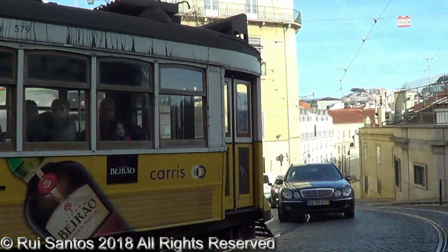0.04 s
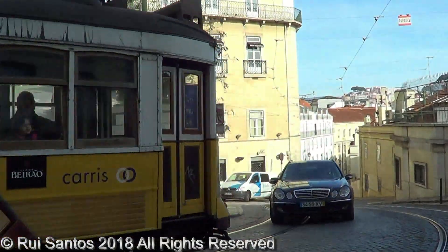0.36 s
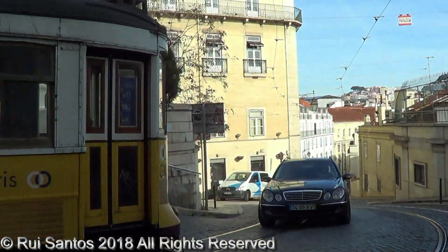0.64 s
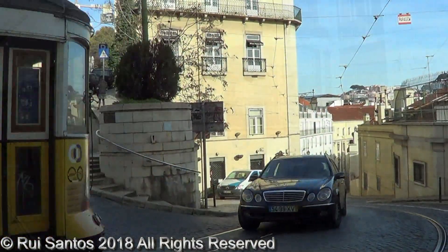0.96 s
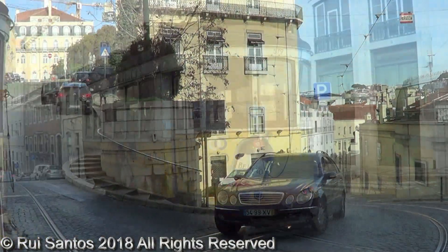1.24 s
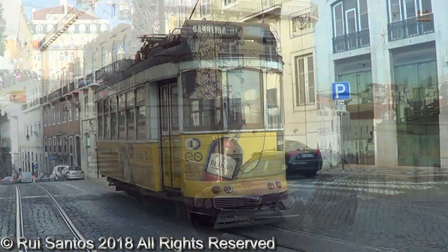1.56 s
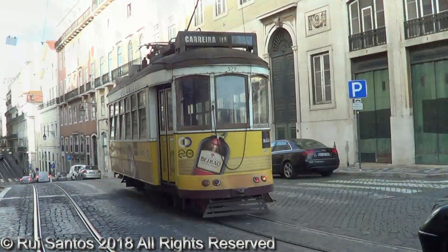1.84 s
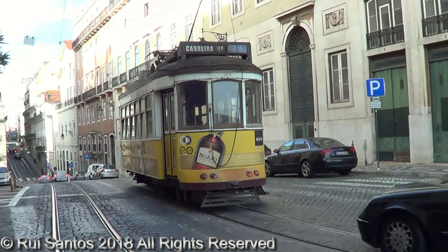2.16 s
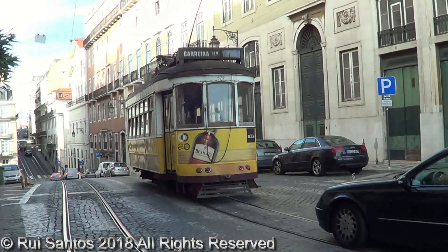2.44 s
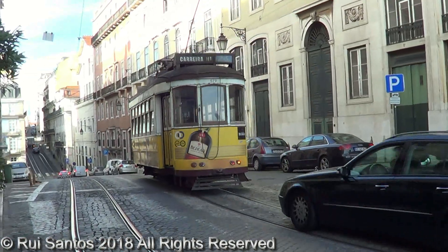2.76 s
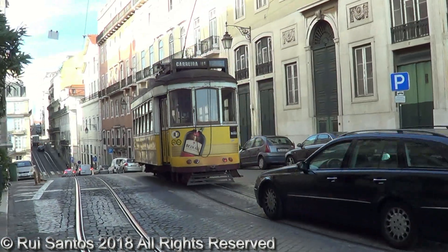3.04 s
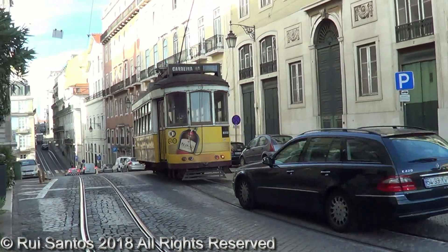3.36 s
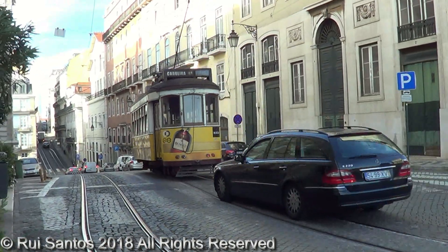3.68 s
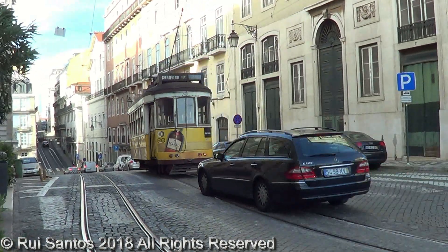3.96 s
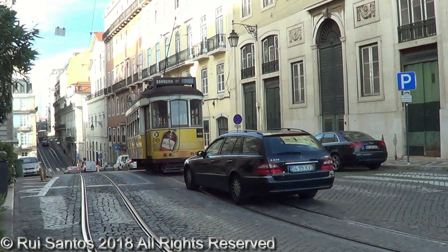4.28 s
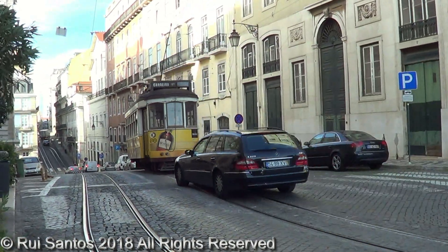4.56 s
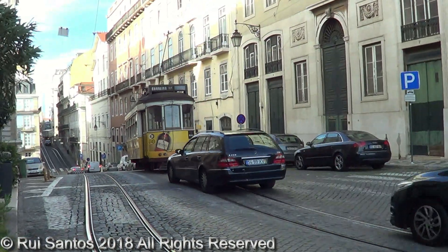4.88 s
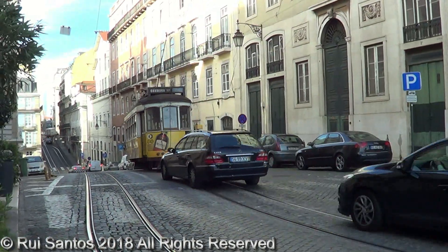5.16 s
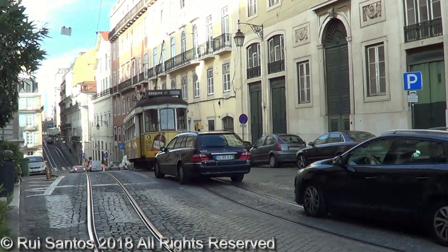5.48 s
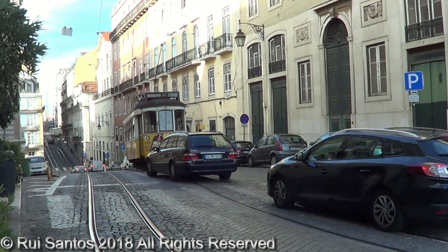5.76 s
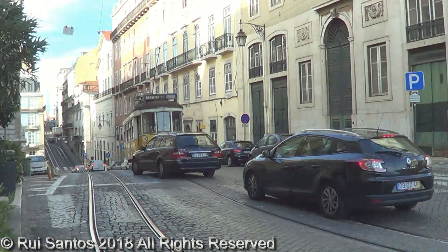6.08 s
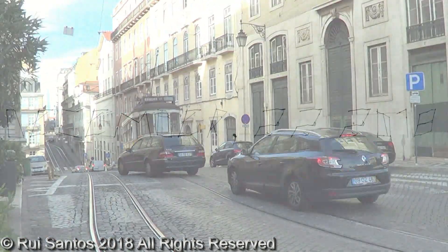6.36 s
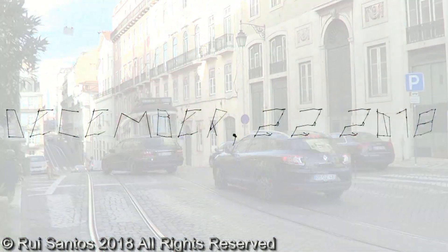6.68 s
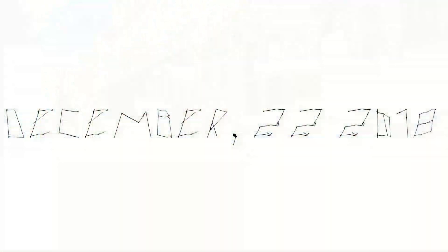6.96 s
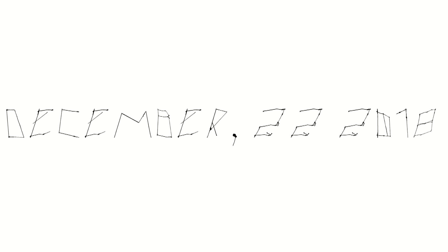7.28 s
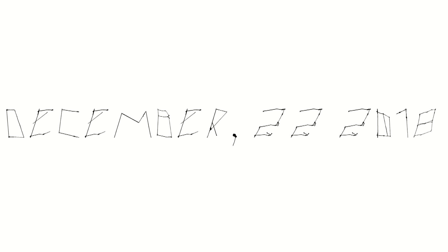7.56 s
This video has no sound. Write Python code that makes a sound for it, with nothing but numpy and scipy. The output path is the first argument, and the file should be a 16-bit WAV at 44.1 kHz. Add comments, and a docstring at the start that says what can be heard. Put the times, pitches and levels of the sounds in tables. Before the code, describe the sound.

An old tram grinds and squeals round a curve close by, then rolls off as two cars follow, thumping over cobbles.

```python
"""An old tram grinds round a curve close by: rough rails rumble in its body and ring its wheels, the
gears whine, and the flanges (the wheels' guiding rims) scrape, bite and squeal on the rail.
From 1 to 2 s the sound blends over to a spot down the street, where the tram clacks, sings faintly
and rolls off. Two cars follow over the cobbles, nearest at about 4 and 6 s, their tyres drumming
and thumping on the track. By 7 s everything has faded out."""
import sys
import numpy as np
from scipy import signal
from scipy.fft import rfft, irfft, next_fast_len
from scipy.io import wavfile

SR = 44100
rng = np.random.default_rng(int(sys.argv[2]) if len(sys.argv) > 2 else 0)


def unload_audio(sound):
    """Save the sound as a 16-bit wav file, at the path given as the first command line argument."""
    columns = np.transpose(np.atleast_2d(sound))
    # keep every value between -1 and 1, then stretch to whole-number steps
    steps = np.round(np.clip(columns, -1, 1) * 32767)
    wavfile.write(sys.argv[1], SR, steps.astype(np.int16))


N = 340893
SIZE = next_fast_len(N, True)
TIME, FREQ = np.arange(N) / SR, np.arange(SIZE // 2 + 1) * SR / SIZE

# how much sound comes from the sides: (frequency [Hz], side minus middle [dB])
STEREO_WIDTH = [(50, 1), (110, -5), (220, -9.5), (450, -8.5), (900, -9), (2100, -10), (3000, -7.5),
                (5000, -5), (7200, -5), (9700, -10), (12000, -35)]
# how far the left channel runs ahead of the right: (frequency [Hz], phase [rad])
LEFT_LEAD = [(0, 0.21), (400, 0.51), (1700, 0.083), (4800, .55), (7000, 0.21), (7900, 0.00035)]

# the passing cars: (time when nearest [s], distance [m], drumming [dB], hiss [dB], boom [dB])
CAR_PASSES = [(4.1, 4.4, -31, -30.5, -63), (5.9, 4.3, -33, -30.5, -38)]
# tyres drumming, tread hissing and car bodies shaking: (frequency [Hz], level [dB])
DRUM_SPECTRUM = [(25, -38), (55, -25), (100, -9), (160, -6.5), (215, 1.5), (280, -1), (400, -13),
                 (900, -19.5)]
TREAD_SPECTRUM = [(250, -9), (500, -4.5), (900, 3), (1300, -4), (2200, -8), (4500, -24), (10000, -27.5),
                  (15000, -34.5)]
BOOM_SPECTRUM = [(25, -15), (55, -1), (120, 0), (165, 7), (260, -16)]
# the air in a nearby car's tyres hums: (start [s], length [s], pitch [Hz], level [dB])
TYRE_HUMS = [(3.75, 1, 209.9, -32.5), (5.05, 1.15, 188.3, -34.5)]
# tyres drop over a rail or a sunken stone: (time [s], tyre ring [dB], body thud [dB])
TYRE_THUMPS = [(2.53, -16.5, -27.5), (2.585, -16, -23), (3.76, -19.5, -31), (4.15, -17.5, -37),
               (4.452, -14.5, -21), (4.515, -16, -27), (5.115, -20, -20.5), (5.265, -25.5, -22.5),
               (5.915, -15.5, -17), (6.235, -22, -29)]
# modes (natural notes) of a tyre's air and of a sprung car body: (pitch [Hz], decay [s], level [dB])
TYRE_MODES = [(185, 0.032, -6.5), (218.6, 0.052, -3), (251, .035, -6), (306, 0.028, -6.5),
              (479.5, .012, -4.5)]
CAR_BODY_MODES = [(52, .05, -16.5), (91.5, 0.043, -6), (136, 0.044, -6), (159.8, 0.04, -0.5)]

# where the tram's rumble and scrape come from: (time [s], lean to the left [0-1])
TRAM_LEAN = [(0, 0.13), (1, 0.7), (1.7, .22), (3.5, .2), (5.5, 0.07)]
# the teeth of the drive gears meeting: (time [s], pitch [Hz], level [dB])
GEAR_WHINE = [(0, 358, -30.5), (.4, 365, -30), (.55, 370, -40), (.95, 381, -27), (1.1, 382, -33.5),
              (1.35, 394, -33), (1.8, 375, -37.5), (2.55, 381, -31.5), (2.8, 385, -50), (6, 405, -59.5)]
# the tram's body drones: (start [s], length [s], pitch [Hz], level [dB])
BODY_DRONES = [(0, .36, 322, -27), (.23, 0.25, 238.8, -27.5), (.97, .13, 323, -31),
               (1.14, 0.26, 507, -31.5), (2.08, .11, 182.6, -30.5), (2.41, 0.2, 208.5, -27.5)]
# a flange sticks and slips regularly: (start [s], length [s], level [dB])
CHATTER_BOUTS = [(0, 0.52, -40), (0.59, .2, -31), (0.848, 0.42, -36)]
# a wheel sings hoarsely: (start [s], length [s], pitch [Hz], width [Hz], level [dB])
HOARSE_NOTES = [(.22, 0.51, 1340, 110, -32.5), (.872, 0.032, 4330, 220, -29), (.955, .11, 4340, 190, -31),
                (1.8, .035, 7300, 220, -27), (2.215, 0.046, 5980, 220, -29), (2.87, 0.0455, 6150, 350, -30),
                (3.18, .05, 3750, 170, -35), (3.61, .06, 3265, 130, -33.5), (3.58, .14, 10500, 250, -44),
                (3.1, 1.95, 2295, 68, -35), (3, 1.5, 3805, 50, -40.5), (3, 2.1, 4115, 45, -43.5),
                (3.03, 1.34, 6100, 400, -40), (2.85, 1.1, 7300, 200, -42), (3.88, 1.5, 2040, 70, -39.5),
                (4.6, 1.36, 893, 31, -37)]
# a wheel squeals: (start [s], length [s], pitch [Hz], level [dB])
SQUEAL_NOTES = [(.18, 0.34, 1204, -32), (0.328, .19, 1985, -32.5), (0.723, 0.65, 1214, -33.5),
                (2.16, 0.26, 1214, -30), (2.83, .17, 1210, -36), (3.31, .095, 7400, -37.5),
                (3.465, .09, 4160, -37.5)]
# grinding slides between the wheel's modes near 2 kHz: (time [s], pitch [Hz], level [dB])
GRIND_PATH = [(0, 2130, -33.5), (.3, 2168, -30.5), (.67, 2074, -28), (.76, 2230, -30), (1.3, 2193, -31.5),
              (1.7, 2220, -65.5)]
# a flange slaps the rail: (time [s], clash [dB], spit of hiss [dB], wheel ring [dB])
FLANGE_SLAPS = [(2.258, -34, -23.5, -41), (2.461, -21, -30.5, -24), (2.885, -26, -32.5, -22)]
# the steel's clash in a slap: (pitch [Hz], width [Hz], level [dB])
CLASH_MODES = [(3350, 450, -2), (4700, 700, -5), (6400, 560, -1.5), (8100, 1000, -4)]
# the spit of hiss in a slap: (frequency [Hz], level [dB])
SPIT_SPECTRUM = [(3500, -11), (4700, 1.5), (7000, -5), (9800, -1), (12000, -7.5), (15500, -13.5)]
# what a slap leaves ringing in the wheel: (pitch [Hz], decay [s], level [dB])
SLAP_MODES = [(3290, 0.063, -4.5), (3370, .035, -4.5)]
# wheels and rail ringing: (pitch [Hz], width [Hz], level beside the tram [dB], level from behind [dB])
WHEEL_MODES = [(508, 30, -17.5, -29), (795, 45, -20, -21.5), (1350, 80, -19.5, -39), (1995, 30, -17, -25.5),
               (2110, 90, -21.5, -22), (2224, 90, -22, -25), (3256, 120, -20.5, -22),
               (3810, 70, -23, -23.5), (4150, 45, -28.5, -26.5), (4300, 100, -21, -34.5),
               (5930, 91, -22, -31.5), (6420, 110, -35.5, -28), (7150, 120, -33, -30),
               (8130, 140, -24, -26), (8850, 220, -19.5, -29)]
# rolling and flange rasp, beside the tram (near) and from behind (far): (frequency [Hz], level [dB])
NEAR_ROLL_SPECTRUM = [(25, -36), (60, -21.5), (110, -11.5), (170, -9), (240, -2), (360, -2.5), (440, -5),
                      (800, -8.5), (1250, -8.5), (1800, -12), (2250, -11), (2600, -16), (3500, -25)]
FAR_ROLL_SPECTRUM = [(25, -37), (65, -29), (105, -4.5), (150, -6.5), (210, 0.5), (480, -2.5), (800, -3),
                     (1100, -6), (1700, -9.5), (2300, -9.5), (2600, -17.5), (3500, -17.5)]
NEAR_RASP_SPECTRUM = [(1800, -22), (2700, -9), (3400, 1), (4300, -1.5), (4800, -3.5), (6000, -2),
                      (7200, -2.5), (8600, 0.5), (9700, -3), (11000, -4.5), (12500, -12), (15500, -16.5)]
FAR_RASP_SPECTRUM = [(1800, -5.5), (2700, -3.5), (3600, -0.5), (5000, -2.5), (6100, 0), (6900, -2.5),
                     (8700, -2), (10500, -7), (12500, -13), (15500, -22)]
# a flange presses on the rail and the scrape swells: (start [s], length [s], rise below 7 kHz [dB])
FLANGE_BITES = [(0, 0.16, 2.5), (0.414, 0.071, 4.5), (.65, .05, 1.5), (0.852, .28, 3.5), (1.744, 0.5, 3),
                (2.54, 0.36, 3.5), (3.13, 0.2, 3), (3.489, 4.7, 3.5)]

BLEND_S, FADE_S = (1.05, 2.11), (6.205, 7.03)  # the move down the street; the final fade
TRAM_SPEED_M_S, CAR_SPEED_M_S = 3.38, 3.7
TAIL_PASSES_S, NEAR_M, FAR_M = 0.77, 2, 27.3  # the tram is FAR_M away as the blend ends
NEAR_ROLL_DB, NEAR_RASP_DB, NEAR_RING_DB = -18.5, -24.5, -20
FAR_ROLL_DB, FAR_RASP_DB, FAR_RING_DB = -22, -26.5, -20.5
# the cars behind the tram block more and more of its sound, the treble most
BLOCKED_FROM_S, ROLL_LOSS_DB_PER_S, RASP_LOSS_DB_PER_S = 4.4, 0.84, 3
DULL_FROM_S, DULL_TIME_S, BRIGHT_DB, DULL_DB = 1.97, 0.49, 5, -2  # the far rasp above 7 kHz
NEAR_SIDE_DB, FAR_SIDE_DB = -2, .5  # gain for the reflections from the sides
TOP_HZ = 15700


def undb(db):
    """Turn decibels into a gain."""
    return np.exp(np.asarray(db) * (np.log(10) / 20))


def curve(rows):
    """The columns of a table, joined by straight lines in time."""
    times, *columns = np.transpose(rows)
    return [np.interp(TIME, times, column) for column in columns]


def colour(points):
    """Gain at every frequency from a spectrum table; it falls away beyond the ends."""
    hz, db = np.transpose(points)
    octave = np.log2(FREQ + 1)
    beyond = np.maximum(0, np.maximum(np.log2(hz[0]) - octave, octave - np.log2(hz[-1])))
    return undb(np.interp(octave, np.log2(hz), db) - 20 * beyond)


def unit(x):
    """Scale to an average strength (rms) of 1."""
    return x / np.sqrt(np.mean(x ** 2))


def wobble(rate):
    """Random values, rate of them a second, joined by straight lines; typical size 1."""
    count = int(TIME[-1] * rate) + 2
    return unit(np.interp(TIME * rate, np.arange(count), rng.standard_normal(count)))


def gate(start, length, attack, release):
    """Rises from start, holds until length has passed, then dies away; all in seconds."""
    rise = np.clip((TIME - start) / attack, 0, 1)
    return rise * np.exp(-np.clip((TIME - start - length) / release, 0, 50))


def ripple(spacing_hz, depth_db):
    """The many lesser modes of a steel structure: random peaks and valleys in its spectrum."""
    heights = rng.standard_normal(4000)
    return undb(depth_db * np.interp(FREQ / spacing_hz, np.arange(len(heights)), heights))


def knocks(per_s, spread_db, decay_s):
    """The force of small impacts at random moments, each dying quickly."""
    hits = (rng.random(N) < per_s / SR) * undb(spread_db * np.clip(rng.standard_normal(N), -2, 2)) ** 2
    power = signal.lfilter([1], [1, -np.exp(-2 / (decay_s * SR))], hits)
    return unit(np.sqrt(power))


def radiate(force, response, lean):
    """Filtered noise that follows a force: direct sound leans to one side, reflections spread wide."""
    direct, reflected = force * rng.standard_normal((2, N))
    mid, side = rfft([direct, reflected + lean * direct], SIZE) * response
    mid, side = irfft([mid, side * colour(STEREO_WIDTH)], SIZE)[:, :N]
    return np.array([mid + side, mid - side]) / np.std(mid)


def tone(hz, db, wander_hz, flutter_db):
    """A wavering note; reflections make its strength differ a little at each ear."""
    phase = 2 * np.pi * np.cumsum(hz + wander_hz * wobble(70)) / SR
    note = np.sin(phase) * undb(flutter_db * wobble(30))
    return undb(db) * unit(np.array([note * undb(1.5 * wobble(8.13)) for ear in range(2)]))


def ring(hz, width_hz):
    """A mode kept ringing by chance pushes; reflections shift its phase between the ears."""
    turning = np.cumprod(np.exp(2j * np.pi * hz / SR) * np.ones(N))
    pushes = rng.standard_normal((int(TIME[-1] * 1.5 * width_hz) + 2, 2)) @ [1, 1j]
    left = np.interp(TIME * 1.5 * width_hz, np.arange(len(pushes)), pushes) * turning
    right = left * np.exp(.6j * rng.standard_normal())
    return unit(np.array([left.real, right.real]))


def struck(time_s, modes, db, attack_s, detuning):
    """A blow sets modes ringing, a little differently each time and at each ear."""
    out, start = np.zeros((2, N)), int(time_s * SR)
    t = TIME[:min(SR // 2, N - start)]
    for hz, decay_s, mode_db in modes:
        detune, offset, spread = rng.standard_normal(3)
        ear_phase = 0.6 * offset + 0.48 * spread * np.array([[1], [-1]])
        phase = 2 * np.pi * hz * (1 + detuning * detune) * t + ear_phase
        envelope = np.minimum(t / attack_s, 1) * np.exp(-t / decay_s)
        out[:, start:start + len(t)] += undb(db + mode_db) * envelope * np.sin(phase)
    return out


def thumps():
    """A tyre drops into a dip: a soft push that sets the tyre and the car's body booming."""
    return sum(struck(time_s, modes, db, attack_s=0.0095, detuning=.02)
               for time_s, tyre_db, body_db in TYRE_THUMPS
               for modes, db in ((TYRE_MODES, tyre_db), (CAR_BODY_MODES, body_db)))


def cars(away):
    """Cobbles drum on the air in the tyres and shake the body while the tread hisses."""
    # each car weakens with distance, and is heard only from the spot down the street
    power = sum(undb(levels_db)[:, None] ** 2 / (1 + (CAR_SPEED_M_S * (TIME - time_s) / metres) ** 2)
                for time_s, metres, *levels_db in CAR_PASSES)
    drum_gain, tread_gain, boom_gain = np.sqrt(power * away)
    lean = -0.16  # the cars keep to the right
    drum = drum_gain * radiate(knocks(220, spread_db=1.2, decay_s=0.033), colour(DRUM_SPECTRUM), lean)
    tread = tread_gain * radiate(knocks(300, spread_db=1.1, decay_s=0.017), colour(TREAD_SPECTRUM), lean)
    boom = boom_gain * radiate(1, colour(BOOM_SPECTRUM), lean)
    hum = sum(undb(db) * gate(start, length, attack=.15, release=.15) * ring(hz, width_hz=18)
              for start, length, hz, db in TYRE_HUMS)
    return drum + tread + boom + hum + thumps()


def gears():
    """The tram's gear teeth meet hundreds of times a second and whine."""
    return tone(*curve(GEAR_WHINE), wander_hz=7.1, flutter_db=2.5)


def drones():
    """The tram's body hums briefly and unsteadily at one of its low modes."""
    return sum(gate(start, length, attack=0.037, release=.06)
               * tone(hz, db, wander_hz=5.4, flutter_db=1.5) for start, length, hz, db in BODY_DRONES)


def chatter(rate_hz):
    """Regular slips of a flange strike the wheel's highest mode."""
    slips = (1 + np.cos(2 * np.pi * np.cumsum(rate_hz + .4 * wobble(8.9)) / SR)) ** 2
    mode = colour([(9000, -29.5), (10550, -13), (10860, -1.0), (11200, -14.5), (13500, -25.5)])
    bouts = sum(undb(db) * gate(start, length, attack=.03, release=.05)
                for start, length, db in CHATTER_BOUTS)
    return bouts * radiate(slips, mode, lean=0)


def singing():
    """Rubbing keeps a wheel mode ringing hoarsely, never locking into a clean tone."""
    return sum(undb(db) * gate(start, length, attack=.08 * length, release=.08 * length)
               * ring(hz, width) for start, length, hz, width, db in HOARSE_NOTES)


def squeals():
    """A wheel mode locks into an unsteady tone."""
    return sum(gate(start, length, attack=0.017, release=.025)
               * tone(hz, db, wander_hz=.008 * hz, flutter_db=1.7)
               for start, length, hz, db in SQUEAL_NOTES)


def grind():
    """A flange grinds close by: a broad, rough ring that wavers in pitch."""
    hz, db = curve(GRIND_PATH)
    return undb(db) * ring(hz + 50 * wobble(25), width_hz=125)


def clacks():
    """A flange slaps the rail: a brief clash of steel, a spit of bright hiss, and the wheel rings on."""
    clash, spit = sum(undb([clash_db, spit_db])[:, None] * gate(time_s, .027, attack=.004, release=.027)
                      for time_s, clash_db, spit_db, _ in FLANGE_SLAPS)
    steel = sum(undb(db) / (1 + (2 * (FREQ - hz) / width) ** 2) for hz, width, db in CLASH_MODES)
    rings = sum(struck(time_s, SLAP_MODES, ring_db, attack_s=.004, detuning=.003)
                for time_s, _, _, ring_db in FLANGE_SLAPS)
    return clash * radiate(1, steel, lean=.2) + spit * radiate(1, colour(SPIT_SPECTRUM), lean=.11) + rings


def wheels(away, flare_db):
    """Each mode swells and sinks by itself as the rail touches different parts of the wheel."""
    return sum(undb(near_db + away * (far_db - near_db) + flare_db * wobble(6)) * ring(hz, width)
               for hz, width, near_db, far_db in WHEEL_MODES)


def rolling(spectrum, judder_db):
    """Rough rails shake the wheels and the body, unevenly."""
    force = undb(judder_db * wobble(35))
    return radiate(force, colour(spectrum) * ripple(22, 1.3), curve(TRAM_LEAN)[0])


def rasp(spectrum, grit, bright_db, bright_share):
    """Flanges slide on the rail in tiny slips; the scrape wanders in pressure and brightness."""
    force = np.sqrt(1 + grit * knocks(260, spread_db=2.0, decay_s=0.0057) ** 2)
    steel = radiate(force, colour(spectrum) * ripple(55, 1.6), curve(TRAM_LEAN)[0])
    bright = signal.sosfiltfilt(signal.butter(2, 7000, "high", fs=SR, output="sos"), steel)
    bite_db = sum(db * gate(start, length, attack=.012, release=.025)
                  for start, length, db in FLANGE_BITES)
    # a bite is heard mostly in the lower, harsher part; the bright part gets only a share
    harsh = (steel - bright) * undb(bite_db + .5 * wobble(18))
    return harsh + bright * undb(bright_db + bright_share * bite_db + 0.3 * wobble(25))


def dulling():
    """Treble of the rasp in dB: bright in the tightest part of the curve, then settling."""
    return DULL_DB + (BRIGHT_DB - DULL_DB) * np.exp(-np.maximum(TIME - DULL_FROM_S, 0) / DULL_TIME_S)


def tram(away):
    """All the tram's sounds, heard first from beside it and then from behind."""
    # from either spot, rolling, rasp and ringing weaken as 1 / distance
    near_m = np.hypot(NEAR_M, TRAM_SPEED_M_S * np.maximum(TIME - TAIL_PASSES_S, 0))
    far_m = FAR_M + TRAM_SPEED_M_S * np.maximum(TIME - BLEND_S[1], 0)
    near, far = np.sqrt(1 - away) * NEAR_M / near_m, np.sqrt(away) * FAR_M / far_m
    blocked_s = np.maximum(TIME - BLOCKED_FROM_S, 0)
    far_low = far * undb(-ROLL_LOSS_DB_PER_S * blocked_s)
    far_high = far * undb(-RASP_LOSS_DB_PER_S * blocked_s)
    roll = near * undb(NEAR_ROLL_DB) * rolling(NEAR_ROLL_SPECTRUM, judder_db=0.48)
    roll += far_low * undb(FAR_ROLL_DB) * rolling(FAR_ROLL_SPECTRUM, judder_db=0.42)
    near_rasp = rasp(NEAR_RASP_SPECTRUM, grit=0.54, bright_db=1.0, bright_share=0.39)
    far_rasp = rasp(FAR_RASP_SPECTRUM, grit=0.2, bright_db=dulling(), bright_share=0.68)
    scrape = near * undb(NEAR_RASP_DB) * near_rasp + far_high * undb(FAR_RASP_DB) * far_rasp
    ring_gain = np.hypot(near * undb(NEAR_RING_DB), np.sqrt(far_low * far_high) * undb(FAR_RING_DB))
    ringing = ring_gain * wheels(away, flare_db=2.0)
    whine = gears()
    steel = scrape + ringing + squeals() + singing() + grind()
    dip = undb(-4.5 * gate(4.435, 0.031, attack=0.009, release=.012))  # the level dips briefly
    return roll + dip * steel + clacks() + whine + drones() + chatter(rate_hz=47.3)


def scene():
    """The tram and the cars that follow it; down the street the reflections are stronger."""
    away = np.interp(TIME, BLEND_S, (0, 1))  # 0 beside the tram, 1 down the street
    left, right = tram(away) + cars(away)
    side_gain = undb(np.interp(TIME, BLEND_S, (NEAR_SIDE_DB, FAR_SIDE_DB)))
    mid, side = (left + right) / 2, (left - right) / 2 * side_gain
    return np.array([mid + side, mid - side])


def record(dry):
    """The left channel runs slightly ahead, the sound fades out, and the highest treble is cut."""
    lead = np.interp(FREQ, *np.transpose(LEFT_LEAD)) * np.array([[.5], [-.5]])
    heard = irfft(rfft(dry, SIZE) * np.exp(1j * lead), SIZE)[:, :N]
    faded = heard * np.interp(TIME, FADE_S, (1, 0))
    return signal.sosfilt(signal.ellip(12, .1, 90, TOP_HZ, fs=SR, output="sos"), faded)


dry = scene()
out = record(dry)
unload_audio(out)
```